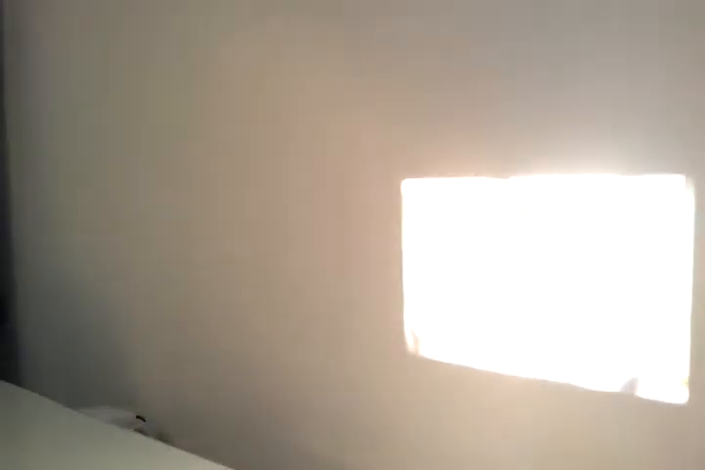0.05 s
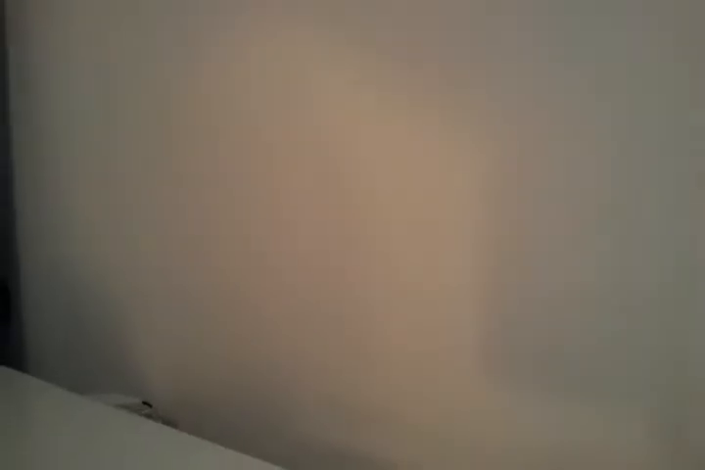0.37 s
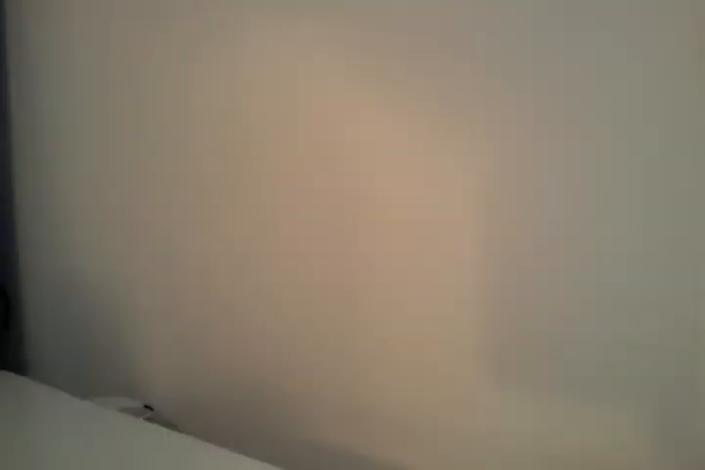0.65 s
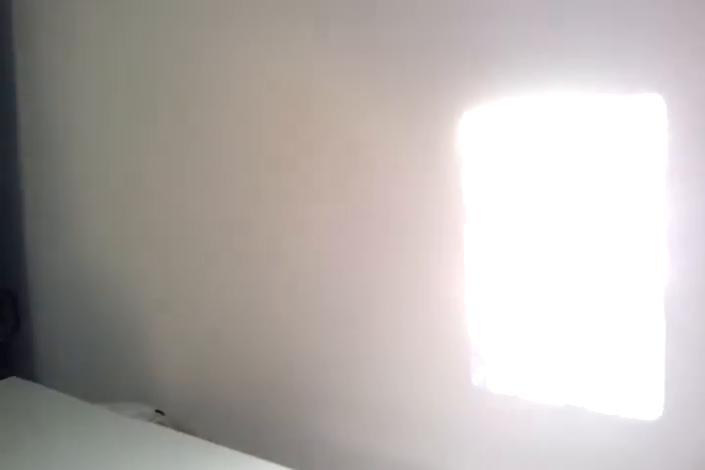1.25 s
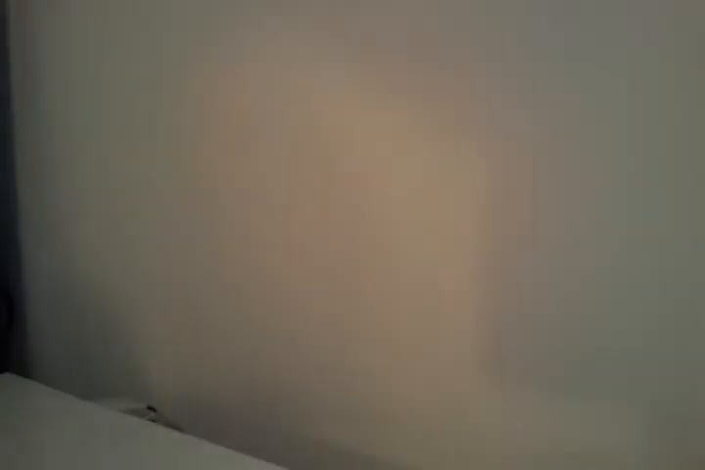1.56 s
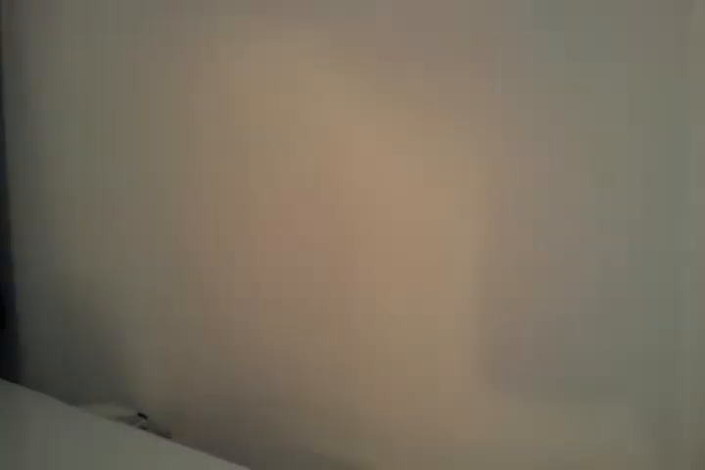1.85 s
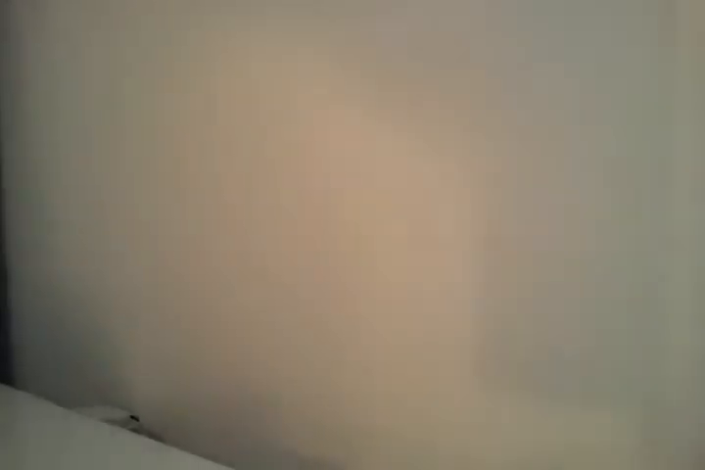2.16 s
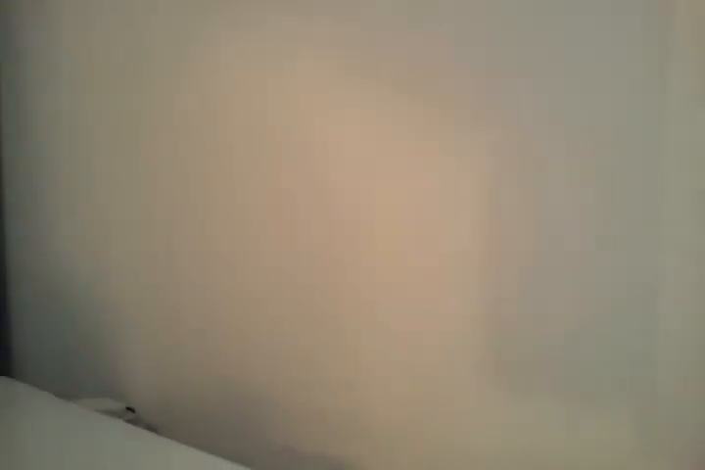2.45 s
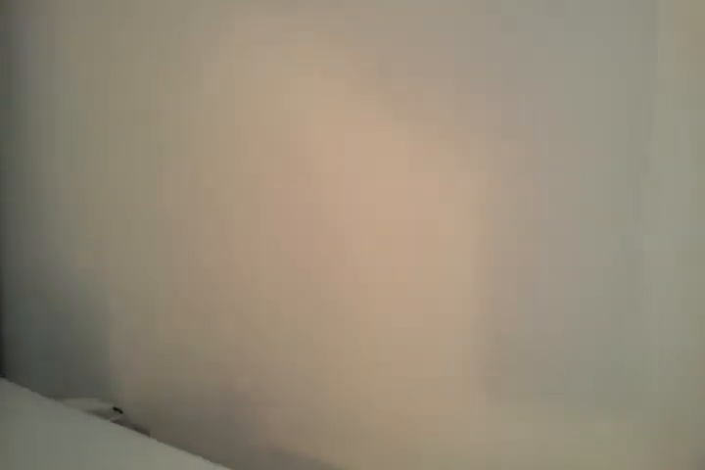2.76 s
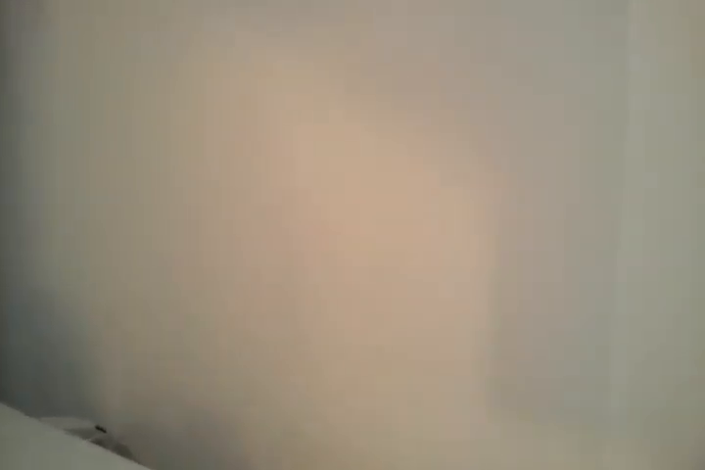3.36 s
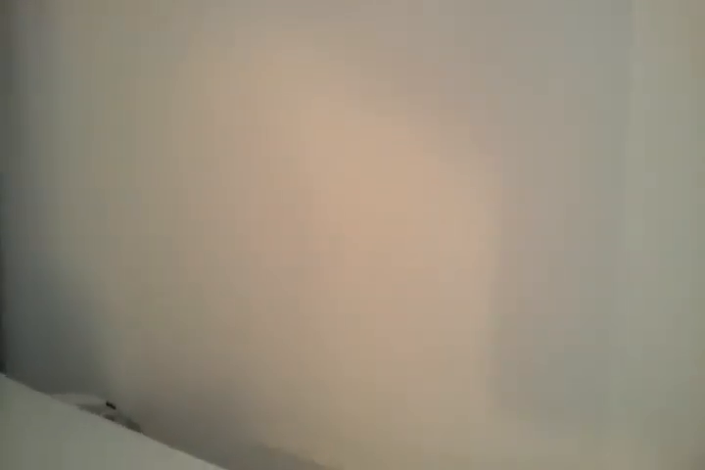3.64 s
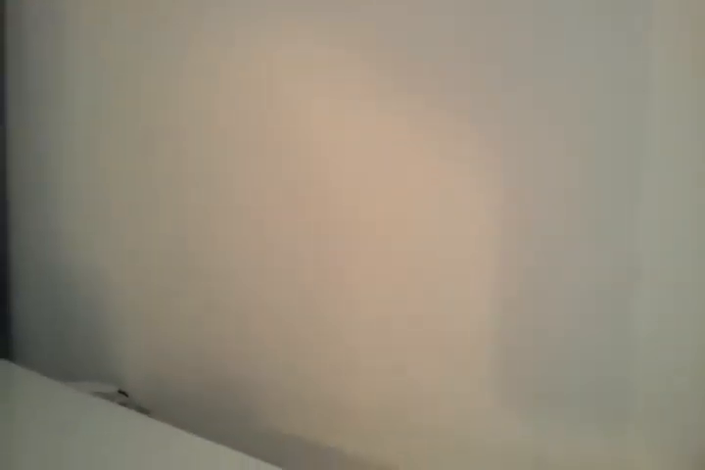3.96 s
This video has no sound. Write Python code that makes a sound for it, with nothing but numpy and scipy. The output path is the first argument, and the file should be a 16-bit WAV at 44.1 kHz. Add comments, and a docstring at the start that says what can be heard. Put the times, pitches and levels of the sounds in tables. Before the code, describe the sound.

Over the even hum of its fan and motor, a slide projector runs through two changes and begins another. Each brings a thunk, light ticks, a brief scrape, a sharp clack and a bright snap, in a small room.

```python
"""A slide projector's tray thunks forward over its steady cooling fan and motor hum, in a small room.
Each cycle: gears whirr, the linkage ticks, a slide scrapes along its slot, the lever clacks home,
a latch catches and the shutter snaps. Two full cycles, then the start of a third.
Every blow rattles in the case, rings the struck part and dies in the room."""
import sys
import numpy as np
from scipy import signal
from scipy.fft import rfft, irfft, next_fast_len
from scipy.io import wavfile

SR = 44100
rng = np.random.default_rng(int(sys.argv[2]) if len(sys.argv) > 2 else 0)


def transcribe(signal):
    """Save signal, clipped to [-1, 1], as a 16-bit WAV file at the path in sys.argv[1]."""
    frames = np.atleast_2d(signal).T
    limited = np.clip(frames, -1, 1)
    pcm = np.round(limited * 32767).astype(np.int16)
    wavfile.write(sys.argv[1], SR, pcm)


N = 176400

# blows per part (time [s], relative level [dB], rattle length [s], tilt [dB/octave])
TRAY_BLOWS = [(0.0, -21, 0.0056, -1.5), (1.9705, -18, 0.0034, 2.5), (3.4775, -22, 0.0053, -0.3),
              (3.487, -20, 0.0088, 0.2)]
LINKAGE_BLOWS = [(.041, -33, 0.014, 5), (.064, -29.5, 0.008, 1.5), (.239, -38, 0.004, 7),
                 (.562, -34, 0.01, 3), (.7148, -48, .006, -13), (.7208, -25.5, 0.0032, 1),
                 (.912, -37, 0.013, 8), (.932, -37.5, 0.0045, 7), (1.950, -35.5, 0.02, 5),
                 (1.961, -22.5, 0.0074, -0.5), (2.006, -39, .008, -6), (2.025, -27.5, 0.0057, 2.5),
                 (2.518, -29.5, 0.0093, -0.5), (2.577, -31, 0.011, -1), (2.671, -34, 0.0043, -5),
                 (2.678, -25, 0.0039, 3), (2.868, -35.5, 0.0095, 8.5), (2.889, -37.5, 0.0051, 6),
                 (3.463, -31.5, 0.026, -1), (3.529, -29, 0.0059, -2.5), (3.542, -32, 0.011, 3),
                 (3.774, -32.5, 0.0098, -4), (3.886, -38, 0.012, -6)]
SEAT_BLOWS = [(.136, -29, 0.0053, -3), (.202, -23, 0.01, 3.5)]
LATCH_BLOWS = [(.785, -30, 0.0074, 0.5), (.795, -31, 0.0066, 6), (2.742, -28.5, 0.0036, 3),
               (2.750, -29.5, 0.0093, 2)]
SHUTTER_BLOWS = [(.8262, -15, 0.0089, 6.5), (2.782, -13, 0.0068, 8)]
CAM_BLOWS = [(.925, -42, 0.015, 4.5), (2.305, -38.5, 0.01, 0), (2.785, -37.5, 0.011, 6),
             (2.885, -36.5, 0.009, 6)]
# lever blows (time [s], relative level [dB], rattle length [s], tilt [dB/octave], ring gain [dB])
LEVER_BLOWS = [(0.5761, -14, 0.0078, -0.1, 2.5), (0.593, -27.5, 0.0065, -4, 2.5),
               (2.532, -10, 0.0057, -0.1, -3.5), (2.548, -23, 0.013, -3, 2)]
# slide travel in the slot (time [s], length [s], level [dB], tilt [dB/octave])
SLIDE_STROKES = [(0.32, 0.041, -29.5, -1.1), (2.274, 0.04, -33.5, 0), (3.8, 0.029, -28, -0.2)]
# gears turning (start [s], end [s], level [dB])
GEAR_SPANS = [(0.0, 0.92, -45.5), (2.22, 2.904, -46.5), (3.5, 4.005, -49)]
# motor and blade tones (frequency [Hz], rms level [dB])
MOTOR_TONES = [(55.5, -74), (120, -70.5), (166.5, -56), (239.8, -51.5), (297, -53.5), (359, -55),
               (382, -54.5), (421, -56), (468, -62), (511, -60.5), (641, -51.5), (1168, -54), (1324, -57.5)]

# noise spectrum per source (frequency [Hz], relative density [dB])
TRAY_SPECTRUM = [(50, -65), (100, -2), (200, -19.5), (400, -7), (560, -8.5), (880, -10), (1110, -11.5),
                 (1240, -8), (1500, -13), (2300, -8), (2830, -10.5), (3300, -3.5), (3970, -12.5),
                 (4440, -8.5), (6000, -10), (6900, -15), (7800, -34), (9000, -49)]
FAN_SPECTRUM = [(20, -52.5), (45, -38), (75, -33.5), (105, -18.5), (150, -12.5), (205, -12), (265, -12.5),
                (300, -4), (340, -14), (420, -5), (560, -4), (680, 3), (820, -3), (950, -1), (1130, -8),
                (1350, -7), (1540, -17.5), (1700, -13), (1900, -19.5), (2080, -11), (2450, -13),
                (2780, -19), (3020, -16.5), (3700, -24), (4300, -22.5), (4600, -26.5), (5900, -25.5),
                (6500, -32.5), (7300, -36.5), (7750, -58), (8100, -74), (10000, -90)]
GEAR_SPECTRUM = [(80, -33.5), (350, 6.5), (1000, 6), (2400, 1.5), (3600, -2.5), (5800, -5), (7000, -11.5),
                 (8000, -35), (9500, -39)]
LINKAGE_SPECTRUM = [(60, -49), (150, -24), (400, -5.5), (900, -5), (1300, -1.5), (1800, -5), (2600, -1.5),
                    (3000, -1), (3450, -13), (3900, -1.5), (4800, -3), (5550, -0.5), (6100, -6.5),
                    (6900, -10.5), (7800, -34.5), (9000, -46)]
SEAT_SPECTRUM = [(60, -50), (150, -30), (350, 9.5), (850, -0.5), (1200, 5.5), (1700, -4), (2100, 2.5),
                 (3200, -5), (4400, -5.5), (6200, -5.5), (6700, -18), (7400, -20), (7900, -45), (9000, -44)]
SLIDE_SPECTRUM = [(100, -6), (350, 3.5), (900, 8), (1600, 0), (2300, 6), (3300, -3.5), (5000, -4),
                  (6500, -6.5), (7800, -26), (9000, -46)]
LEVER_SPECTRUM = [(59, -57), (100, -21.5), (172, -32.5), (345, -9.5), (503, -16), (819, -7.5), (1310, -9),
                  (1490, -11), (1740, -10), (1910, -9), (2730, -3.5), (3230, -9), (3680, -3.5), (4200, -14),
                  (4880, -5), (6350, -7), (8900, -44.5), (11600, -60), (19600, -120)]
LATCH_SPECTRUM = [(60, -48), (150, -27), (400, -22), (1250, 7.5), (1850, -5), (2600, -1), (3000, 10),
                  (3450, -10), (3900, -1.5), (4550, -1.5), (5300, -7), (6300, -11), (7200, -14),
                  (7900, -40), (9000, -40)]
SHUTTER_SPECTRUM = [(59, -70), (100, -39.5), (208, -21), (409, -4), (532, -22.5), (804, 8), (952, -4.5),
                    (1310, -3), (2140, -13.5), (2530, -4), (2830, -11.5), (3290, -5), (3480, -15),
                    (4280, -7.5), (5780, -8), (7380, -24.5), (8900, -58.5), (11600, -78), (19600, -120)]
CAM_SPECTRUM = [(60, -32.5), (150, -22), (300, 4.5), (450, 4), (700, -3.5), (1500, -20.5), (4000, -54.5),
                (9000, -78)]

# modes per struck part (frequency [Hz], relative level [dB], t60 [s])
TRAY_RING = [(355, -16, 0.23), (393.6, -4, 0.076), (467.4, -14.5, 0.17), (685, -9, 0.05),
             (866, -15.5, 0.15), (2416, -25, 0.22), (3305, -22.5, .1)]
LINKAGE_RING = [(3100, -15, 0.058), (5800, -17.5, .06)]
SEAT_RING = [(866, -5, 0.073), (1475, -7, 0.044), (1735, -11, 0.091)]
LEVER_RING = [(370, -16, .11), (860, -15, .1), (1320, -14, .08), (1750, -14, .08), (2410, -16, .1),
              (2671, -11, .13), (2728, -9.5, .175), (2810, -15, .12), (3020, -15, .13), (3700, -21, .09)]
LATCH_RING = [(3030, -14, 0.035), (3160, -24, .08)]
SHUTTER_RING = [(1163, -21, .12), (3025, -12, .09), (3279, -15, .07), (3661, -17, .065), (3994, -17, .08),
                (5186, -15, .08), (5510, -31, .42), (5633, -14, .06), (5782, -15, .06), (5929, -14, .06)]
CASE_RING = [(355, -3, 0.16), (443, -7.5, 0.18)]

# decay of case and room per band (frequency [Hz], t60 [s])
CASE_DECAY = [(200, 0.18), (700, 0.22), (2000, 0.079), (5000, 0.037), (8000, .045)]
ROOM_DECAY = [(200, .25), (1000, .22), (3000, 0.22), (6000, 0.15), (8500, 0.16)]

RISE_S, ROOM_DB = 0.00062, -11
CONTACTS_PER_S, CONTACT_S, CONTACT_DB = 290, 0.0011, -9.5  # chatter of loose parts
RING_ROUGH_DB, RING_ROUGH_HZ = 2, 130  # reflections roughen each ring
RING_SPREAD = 0.0013  # relative pitch scatter, blow to blow


def amp(db):
    return 10 ** (np.asarray(db) / 20)


def unit_rms(x):
    return x / np.sqrt(np.mean(x ** 2) + 1e-20)


def log_interp(points, hz):
    """Table value on a log-frequency axis."""
    points_hz, values = np.transpose(points)
    return np.interp(np.log(hz + 1), np.log(points_hz + 1), values)


def add(mix, time_s, sound):
    part = mix[max(round(time_s * SR), 0):][:len(sound)]
    part += sound[:len(part)]


def colour(x, spectrum, tilt_db_oct=0):
    """Shape x by a spectrum, tilted above 400 Hz; rms 1."""
    hz = np.fft.rfftfreq(len(x), 1 / SR)
    octaves = np.log2(np.maximum(hz, 400) / 1000)
    gain = amp(log_interp(spectrum, hz) + tilt_db_oct * octaves)
    return unit_rms(irfft(rfft(x) * gain, len(x)))


def hiss(n):
    """Flat-spectrum noise."""
    return unit_rms(irfft(np.exp(2j * np.pi * rng.random(n // 2 + 1)), n))


def even_hiss(n, block):
    """Flat noise, equal power in every block."""
    phases = rng.random((n // block + 1, block // 2 + 1))
    return unit_rms(irfft(np.exp(2j * np.pi * phases), block, axis=1).ravel()[:n])


def drift(n, rate_hz):
    """Slow random motion up to about rate_hz."""
    step = 32
    n_coarse = next_fast_len(n // step + 2)
    hz = np.fft.rfftfreq(n_coarse, step / SR)
    lowpass = (hz > 0) / (1 + (hz / rate_hz) ** 4)
    slow = irfft(rfft(rng.standard_normal(n_coarse)) * lowpass, n_coarse)
    return np.interp(np.arange(n) / step, np.arange(n_coarse), unit_rms(slow))


def decay(age_s, t60_s):
    return np.exp(-np.log(1000) * age_s / t60_s)


def band_decay(x, age_s, bands):
    """Decay each band of x at its own t60."""
    hz, bins = np.fft.rfftfreq(len(x), 1 / SR), rfft(x)
    centres_hz, t60s_s = np.transpose(bands)
    masks = [log_interp(list(zip(centres_hz, row)), hz) for row in np.eye(len(bands))]
    return sum(irfft(bins * mask, len(x)) * decay(age_s, t60_s) for mask, t60_s in zip(masks, t60s_s))


def blow(rattle_s, tilt_db_oct, spectrum, modes, ring_db):
    """Loose parts chatter; then case, struck part and room ring out."""
    n, n_case = 12288, 6144
    t = np.arange(n) / SR
    age_s = np.maximum(t - rattle_s, 0)
    contacts = (rng.random(n_case) < CONTACTS_PER_S / SR) * 1.
    contacts[0] = 1
    pulses = signal.lfilter([1], [1, -np.exp(-1 / (CONTACT_S * SR))], contacts)
    chatter = even_hiss(n_case, block=256) * unit_rms(1 + amp(CONTACT_DB) * pulses)
    case = band_decay(colour(chatter, spectrum, tilt_db_oct), age_s[:n_case], CASE_DECAY)
    room = amp(ROOM_DB) * band_decay(colour(hiss(n), spectrum, tilt_db_oct), age_s, ROOM_DECAY)
    ring = np.zeros(n)
    for hz, mode_db, t60_s in modes:
        envelope = amp(mode_db + ring_db + RING_ROUGH_DB * drift(n, RING_ROUGH_HZ)) * decay(age_s, t60_s)
        detuned_hz = hz * (1 + RING_SPREAD * rng.standard_normal())
        ring += np.sqrt(2) * envelope * np.sin(2 * np.pi * (detuned_hz * t + rng.random()))
    sound = (ring + room) * np.minimum(t / max(rattle_s, RISE_S), 1)  # builds during the rattle
    add(sound, 0, case * np.minimum(t[:n_case] / RISE_S, 1))
    return sound


def blows(rows, spectrum, modes, gain_db, ring_db):
    """Place one part's blows in time."""
    out = np.zeros(N)
    for time_s, db, rattle_s, tilt_db_oct in rows:
        add(out, time_s, amp(db + gain_db) * blow(rattle_s, tilt_db_oct, spectrum, modes, ring_db))
    return out


def tray_thunks():
    """The tray steps on and rings low."""
    return blows(TRAY_BLOWS, TRAY_SPECTRUM, TRAY_RING, gain_db=-0.5, ring_db=-0.5)


def fan(rms_db=-38.85):
    """Air rushes evenly through the vents."""
    return amp(rms_db) * colour(even_hiss(N, block=4096), FAN_SPECTRUM)


def motor(wander_hz=1.92, wander_rate_hz=5, waver_db=0.93, waver_rate_hz=6):
    """Motor and blade tones, each wavering in level and pitch."""
    out = np.zeros(N)
    for hz, db in MOTOR_TONES:
        peak = np.sqrt(2) * amp(db + waver_db * drift(N, waver_rate_hz))
        pitch_hz = hz + wander_hz * drift(N, wander_rate_hz)
        out += peak * np.sin(2 * np.pi * np.cumsum(pitch_hz) / SR)
    return out


def gears(rough_db=2, rough_hz=120, ramp_s=0.06):
    """Faint gritty whirr while the changer turns."""
    t = np.arange(N) / SR
    running = sum(amp(db) * np.clip(np.minimum(t - start_s, end_s - t) / ramp_s + 0.5, 0, 1)
                  for start_s, end_s, db in GEAR_SPANS)
    grit = hiss(N) * amp(rough_db * drift(N, rough_hz))
    return running * colour(grit, GEAR_SPECTRUM)


def linkage_ticks():
    """Light blows in the linkage."""
    return blows(LINKAGE_BLOWS, LINKAGE_SPECTRUM, LINKAGE_RING, gain_db=-2.86, ring_db=5)


def seat_knocks():
    """A slide knocks against its seat."""
    return blows(SEAT_BLOWS, SEAT_SPECTRUM, SEAT_RING, gain_db=-2, ring_db=0)


def slide_scrapes(attack_s=0.012, release_s=0.035, fade_db=-4, slip_db=2, slip_hz=400):
    """A slide mount catches and slips along its slot."""
    out, t = np.zeros(N), np.arange(SR // 4) / SR
    for time_s, length_s, db, tilt_db_oct in SLIDE_STROKES:
        slips = amp(slip_db * drift(len(t), slip_hz))
        friction = colour(hiss(len(t)) * slips, SLIDE_SPECTRUM, tilt_db_oct)
        attack = np.minimum(t / attack_s, 1)
        fade = amp(fade_db * np.minimum(t / length_s, 1) ** 2)
        release = np.exp(-np.maximum(t - length_s, 0) / release_s)
        add(out, time_s, amp(db) * attack * fade * release * friction)
    return out


def lever_clacks():
    """The lever slams home and bounces; its steel arm rings."""
    return sum(blows([row], LEVER_SPECTRUM, LEVER_RING, gain_db=-2.97, ring_db=ring_db)
               for *row, ring_db in LEVER_BLOWS)


def latch_catches():
    """The latch clicks twice just before each snap."""
    return blows(LATCH_BLOWS, LATCH_SPECTRUM, LATCH_RING, gain_db=0.3, ring_db=9)


def shutter_snaps():
    """The shutter snaps and rings bright."""
    return blows(SHUTTER_BLOWS, SHUTTER_SPECTRUM, SHUTTER_RING, gain_db=-0.8, ring_db=2)


def cam_bumps():
    """Gate and cam come to rest; the case rings dully."""
    return blows(CAM_BLOWS, CAM_SPECTRUM, CASE_RING, gain_db=0.5, ring_db=-1)


def scene(low_cut_hz=143):
    """Changer over gears, fan and motor; mono."""
    changer = (tray_thunks() + lever_clacks() + shutter_snaps() + linkage_ticks()
               + seat_knocks() + latch_catches() + cam_bumps() + slide_scrapes())
    # keeps the knocks and clicks free of low rumble
    low_cut = signal.butter(2, low_cut_hz, "highpass", fs=SR, output="sos")
    return (signal.sosfilt(low_cut, changer) + gears() + fan() + motor())[None]


def record(dry, ceiling=0.62, high_cut_hz=9055):
    """Round off the loudest peaks, then low-pass."""
    rounded = dry / (1 + (dry / ceiling) ** 8) ** (1 / 8)
    lowpass = signal.firwin(255, high_cut_hz, window=("kaiser", 9), fs=SR)
    return signal.oaconvolve(rounded, lowpass[None], "same")


dry = scene()
out = record(dry)
transcribe(out)
```